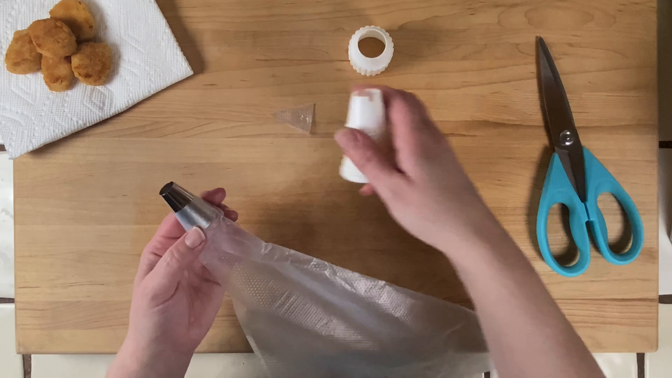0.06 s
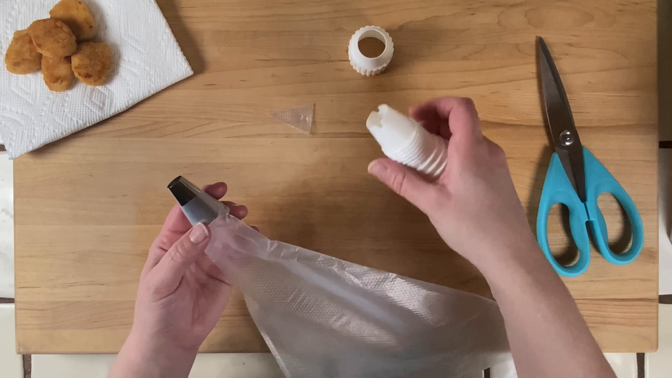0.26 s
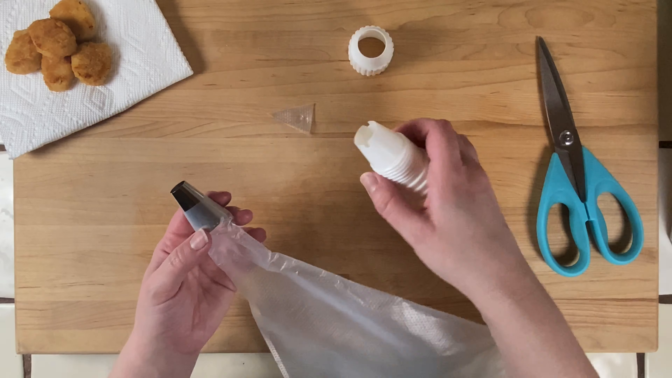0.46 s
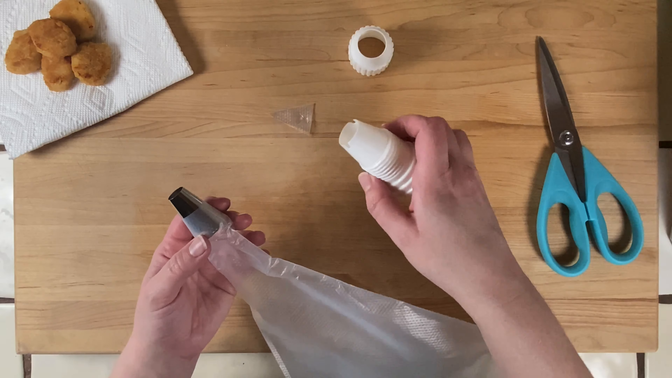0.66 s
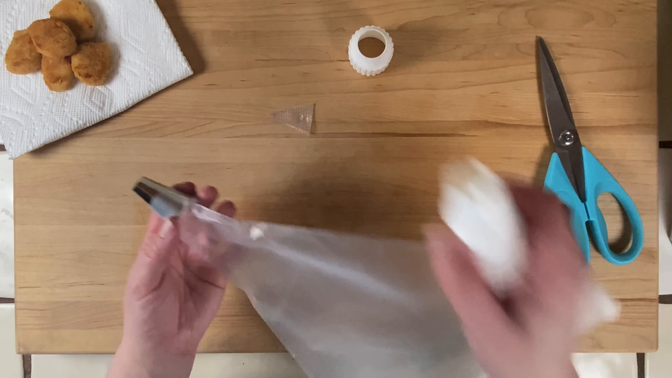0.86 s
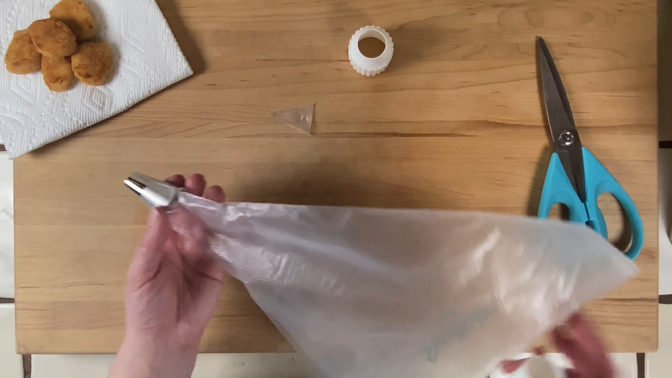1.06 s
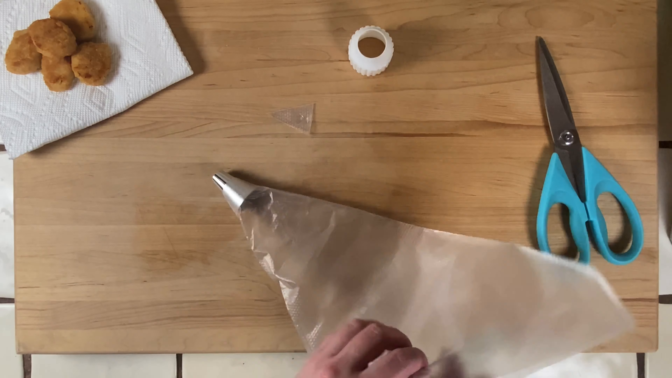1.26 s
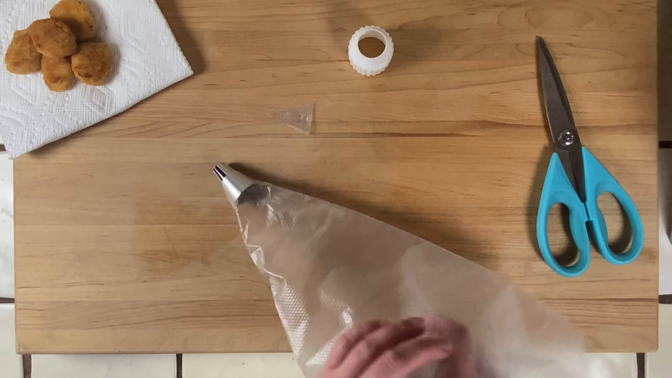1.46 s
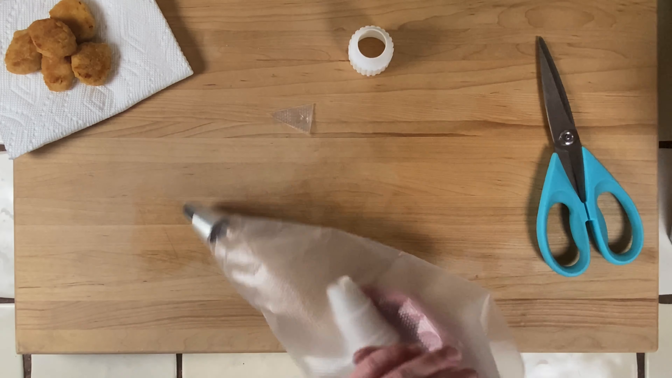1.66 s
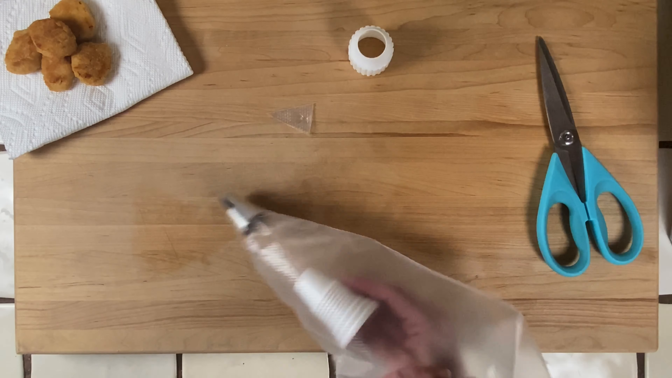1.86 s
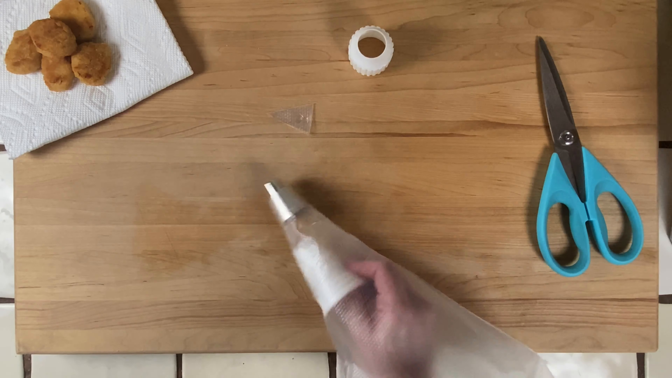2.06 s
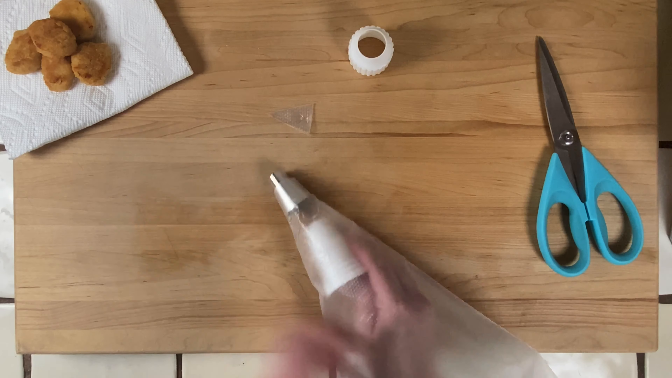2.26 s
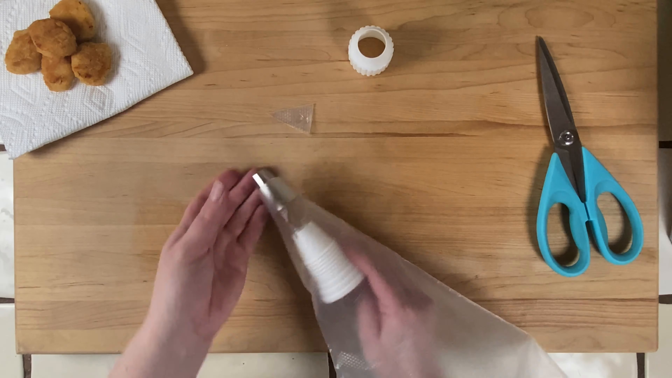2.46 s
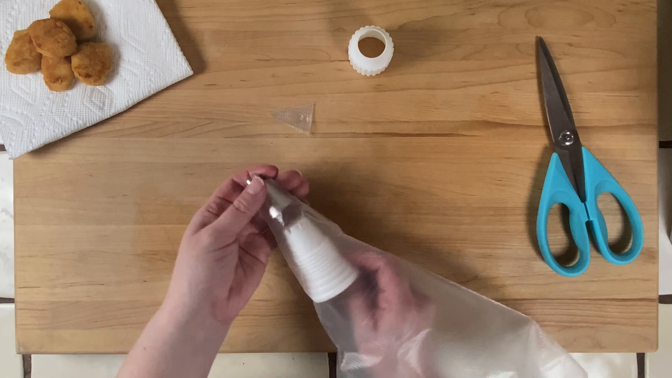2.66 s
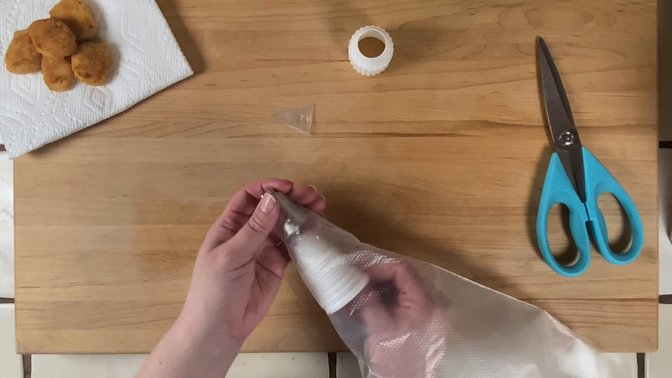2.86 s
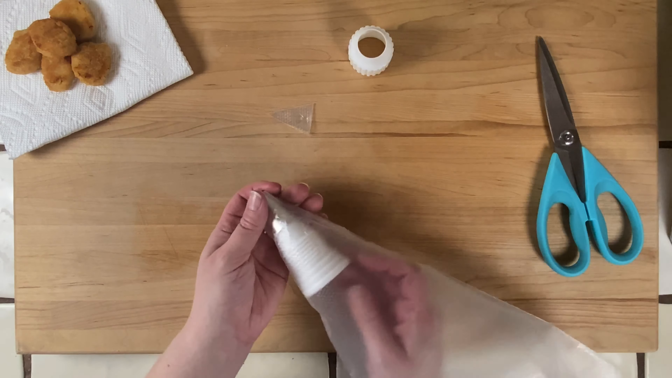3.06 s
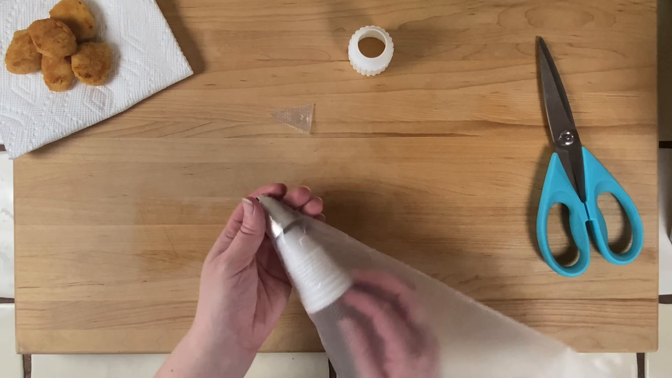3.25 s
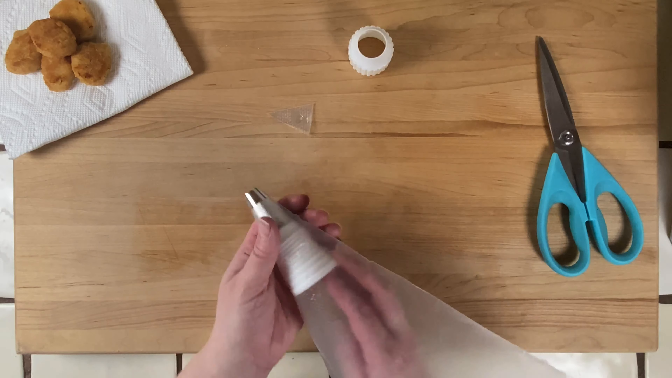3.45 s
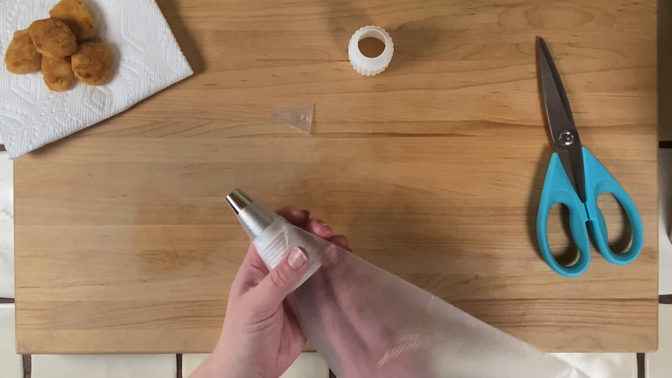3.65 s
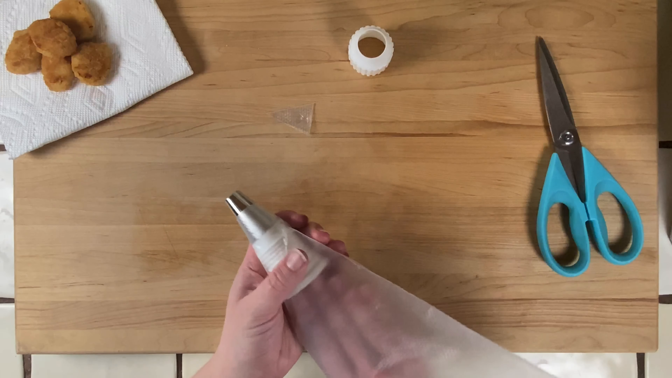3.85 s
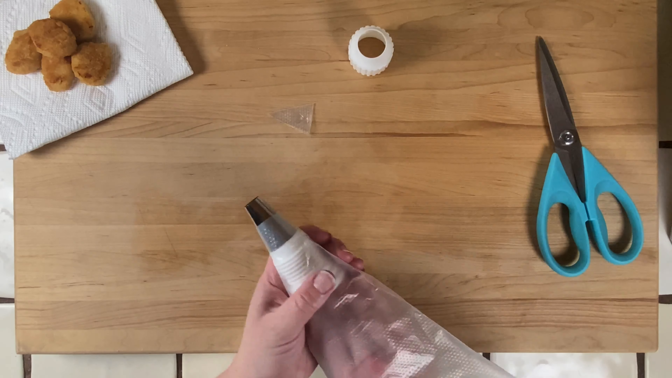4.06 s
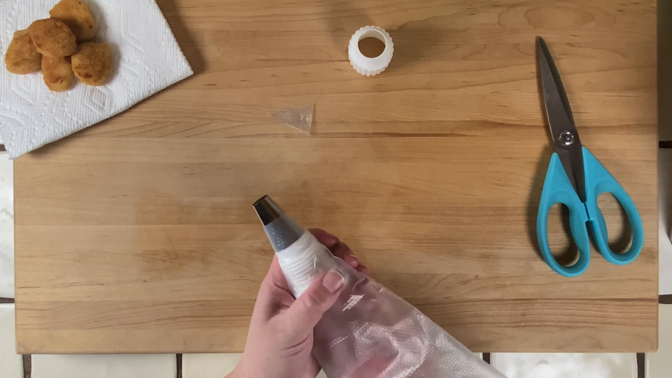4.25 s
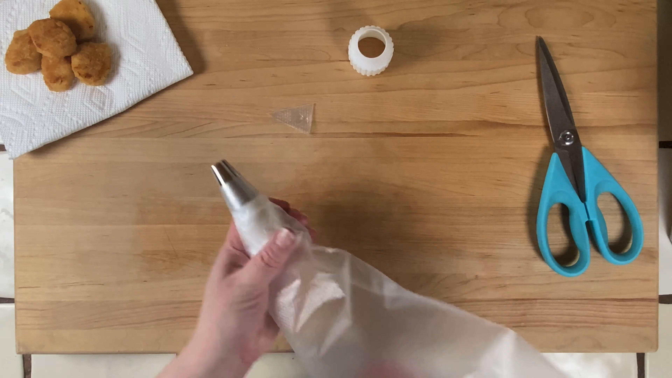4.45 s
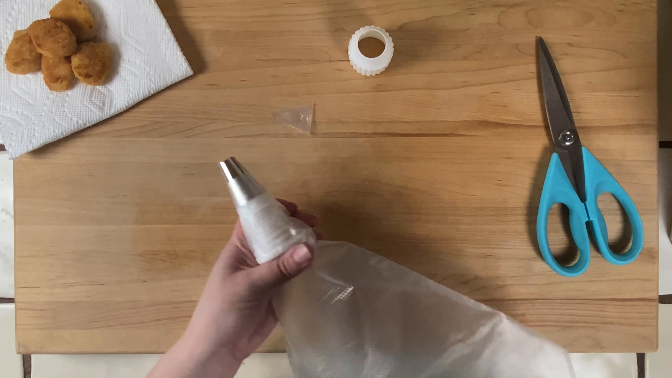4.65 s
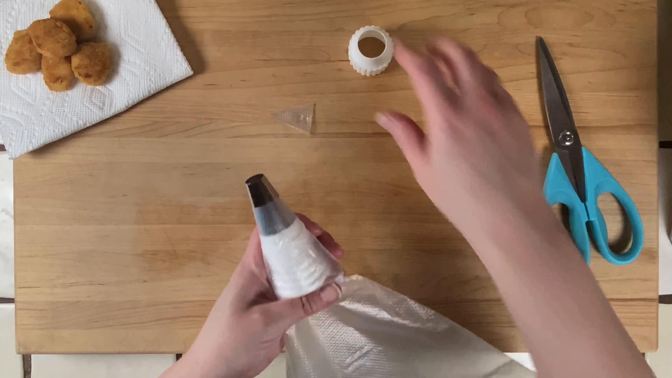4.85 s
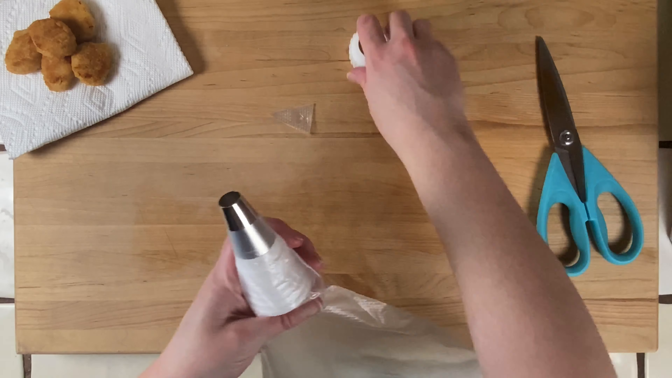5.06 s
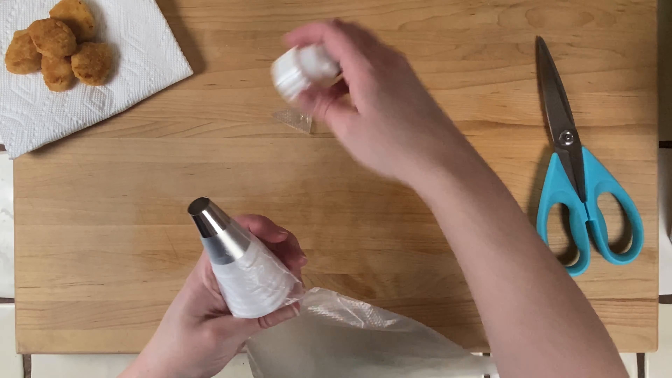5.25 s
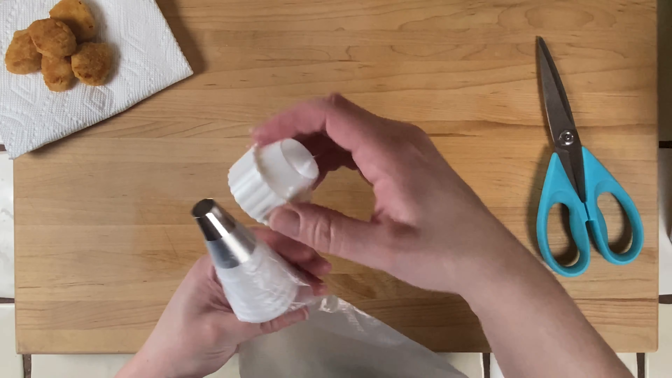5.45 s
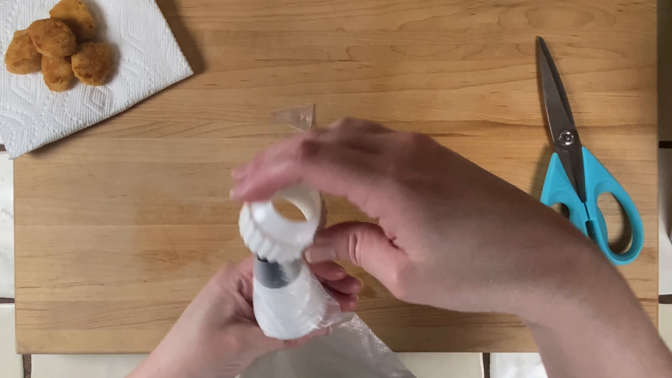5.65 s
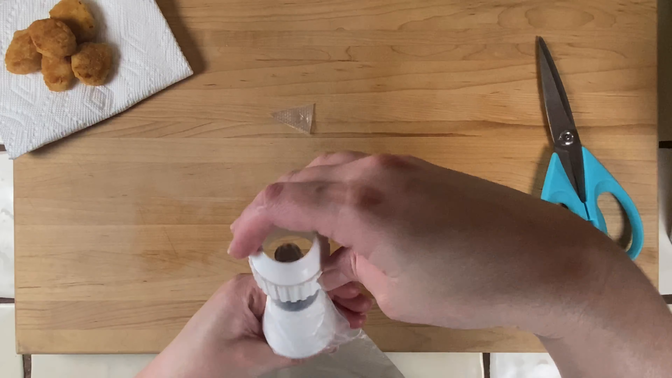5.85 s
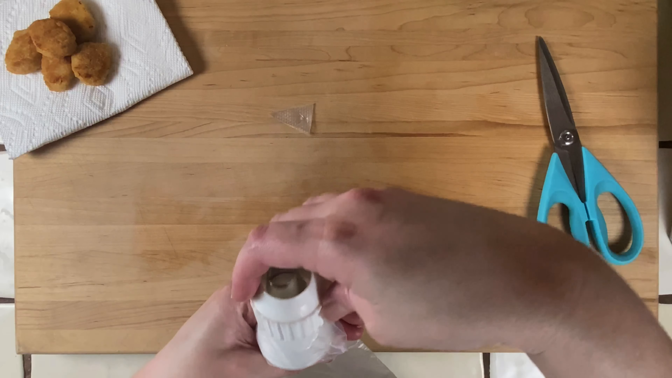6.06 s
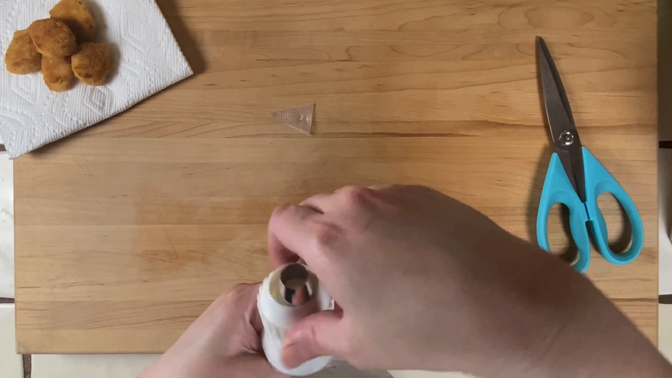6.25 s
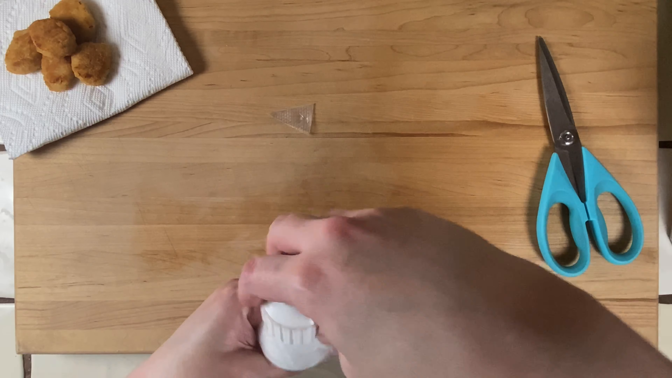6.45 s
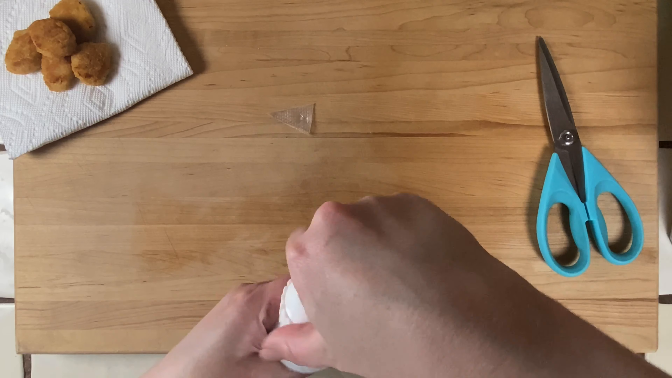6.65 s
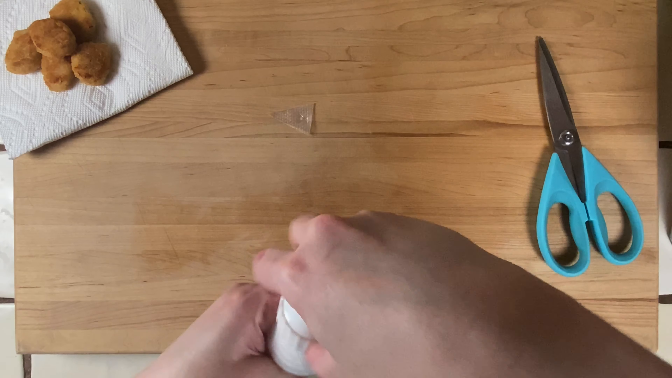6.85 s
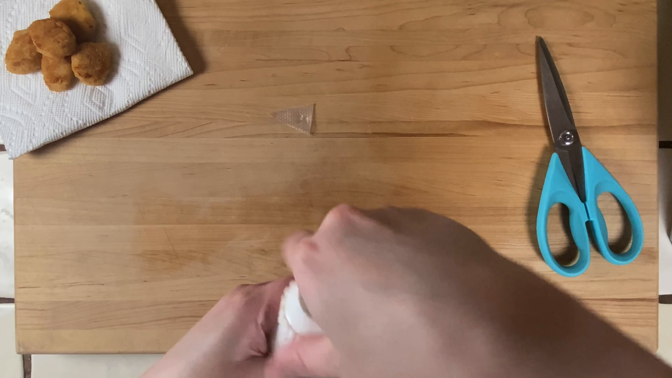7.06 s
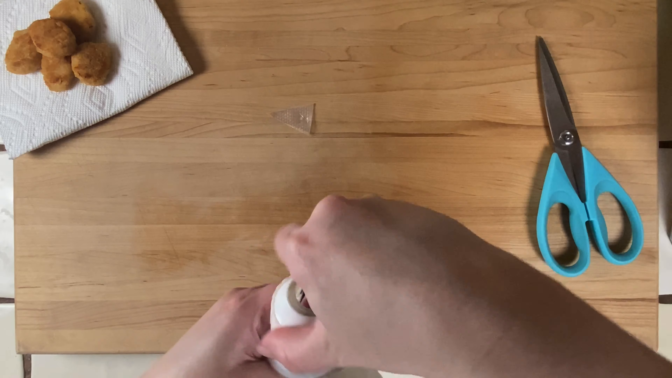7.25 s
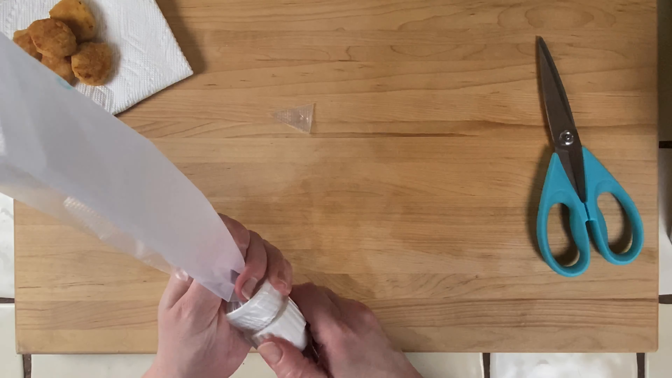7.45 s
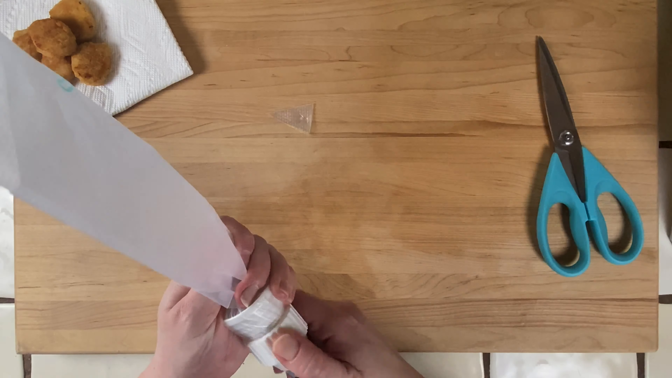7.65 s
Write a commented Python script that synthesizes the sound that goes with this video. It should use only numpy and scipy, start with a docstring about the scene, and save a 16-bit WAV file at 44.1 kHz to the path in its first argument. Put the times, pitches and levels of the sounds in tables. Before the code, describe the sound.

Sparse crackles of a thin plastic bag and a couple of soft plastic taps come first, then loud, irregular rustling and popping for several seconds. It thins to bright small crinkles, plastic clacks and short dry thread ticks with quiet gaps. Close stereo pickup, short dull room tail, faint low fridge hum.

```python
"""Thin plastic film crinkles and snaps as hands work a coupler into a piping bag and screw its ring on.
Crinkle is banded noise shaped by random creases; snaps are noise bursts with a ringing pluck; small cracks
fill in. Film and cone colour them; dry ticks and hollow knocks come from the hard plastic over a board.
A refrigerator hums as steady sines over faint room noise, and a short dull kitchen tail follows the hands."""
import sys
import numpy as np
from scipy import signal
from scipy.fft import rfft, irfft, next_fast_len
from scipy.io import wavfile
from scipy.ndimage import uniform_filter1d

SR = 44100
rng = np.random.default_rng(int(sys.argv[2]) if len(sys.argv) > 2 else 0)


def put_to_file(sound):
    """Save the sound as 16-bit audio at rate SR, in the file named by the first command-line argument."""
    columns = np.atleast_2d(sound).T  # one column per channel
    safe = np.clip(columns, -1, 1)
    whole_steps = np.round(safe * 32767)
    wavfile.write(sys.argv[1], SR, whole_steps.astype(np.int16))


N = 340011
SIZE = next_fast_len(N + 8192)   # FFT length, with room for filter tails
HZ = np.arange(SIZE // 2 + 1) * SR / SIZE


def from_db(db):
    """Decibels to gain."""
    return 10 ** (np.asarray(db) / 20)


def rms_one(x):
    """Scale to unit rms."""
    return x / np.sqrt(np.mean(x ** 2) + 1e-20)


def at_hz(points):
    """Read a table of (Hz, value) on the FFT grid, straight on a log frequency axis."""
    hz, value = np.transpose(points)
    return np.interp(np.log(HZ + 1), np.log(hz + 1), value)


def causal(x, db):
    """Filter by a dB response with minimum phase, so that nothing sounds early."""
    cepstrum = irfft(db * np.log(10) / 20, SIZE)
    cepstrum[1:SIZE // 2] *= 2
    cepstrum[SIZE // 2 + 1:] = 0
    return irfft(rfft(x, SIZE) * np.exp(rfft(cepstrum)), SIZE)[..., :N]


def butter(x, order, cut_hz, kind):
    """Butterworth filter of the given order."""
    return signal.sosfilt(signal.butter(order, cut_hz, kind, fs=SR, output="sos"), x)


def resonator(hz, t60):
    """Pole radius, sine of the pole angle and feedback terms of a ring that dies by 60 dB in t60 seconds."""
    r = from_db(-60 / (t60 * SR))
    w = 2 * np.pi * hz / SR
    return r, np.sin(w), [1, -2 * r * np.cos(w), r * r]


def drift(rate_hz):
    """Slow random wander with unit rms, worked out every 40 samples."""
    r = np.exp(-80 * np.pi * rate_hz / SR)
    white = rng.standard_normal(N // 40 + 2002)
    slow = signal.lfilter([1], [1, -2 * r, r * r], white)[2000:]
    return np.interp(np.arange(N) / 40, np.arange(len(slow)), rms_one(slow))


def gritty(shape, grit_db):
    """Noise of tiny cracks with very unequal sizes, at unit rms."""
    sizes = from_db(grit_db * np.minimum(rng.standard_normal(shape), 2))
    return rms_one(rng.standard_normal(shape) * sizes)


def split(layers):
    """Cut each frequency band from its own layer of sound and sum the bands."""
    # Band edges in Hz, from low to high.
    edges_hz = [60, 300, 1150, 1800, 2800, 4200, 6500, 10000, 17000]
    bands = zip(edges_hz, edges_hz[1:])
    return sum(butter(layer, 2, edges, "band") for edges, layer in zip(bands, layers))


def refrigerator():
    """Compressor hum: steady sine tones whose levels waver a little."""
    # Each row: frequency in Hz, level in dB.
    hum_tones = [(72.0, -59.5), (134.6, -69), (145.3, -76), (208.6, -74)]
    t = np.arange(N) / SR
    out = 0
    for hz, db in hum_tones:
        gain = np.sqrt(2) * from_db(db + 1.5 * drift(3.9))
        out = out + gain * np.sin(2 * np.pi * (hz * t + rng.random()))
    return out


def room_noise():
    """Faint coloured noise, slowly wavering in level."""
    # Colour of the air. Each row: frequency in Hz, relative density in dB per Hz.
    air_colour, air_db = [(100, 3), (170, -5), (260, -2.5), (400, -11.5), (600, -9), (800, -4), (1000, -46),
                          (1200, -17.5), (1500, -19), (2500, -14), (4000, -15.5), (6000, -20.5),
                          (9000, -20.5), (14000, -24.5)], -66
    air = causal(rng.standard_normal((2, N)), at_hz(air_colour))
    return from_db(air_db + 0.5 * drift(0.77)) * rms_one(air)


def effort():
    """Drive of the crinkle in dB from handling and ring turns together, and the turns' share of its power."""
    # How hard the hands work the film. Each row: time in seconds, drive in dB.
    handling = [(0.0, -57), (0.68, -90), (1.14, -74.5), (1.3, -45), (1.44, -41.5), (1.5, -33.5),
                (1.52, -36), (1.565, -32), (1.64, -36.5), (1.75, -31), (1.8, -40.5), (1.86, -32),
                (1.99, -37), (2.2, -35.5), (2.24, -45.5), (2.51, -63), (2.605, -59), (2.63, -37.5),
                (2.81, -40), (2.93, -35), (3.06, -32.5), (3.08, -43.5), (3.19, -47.5), (3.33, -49.5),
                (3.48, -42), (3.67, -43.5), (3.91, -54.5), (4.12, -40), (4.21, -51), (4.38, -36),
                (4.47, -41.5), (4.64, -33), (4.81, -41), (4.85, -52), (5.0, -50.5), (5.06, -58),
                (5.13, -63.5), (5.33, -65.5), (5.4, -45), (5.43, -42.5), (5.455, -44.5), (5.52, -60.5),
                (5.63, -48), (5.84, -63), (6.03, -88), (7.1, -78.5), (7.45, -99), (7.71, -74.5)]
    # Ring turns that drag film over the thread. Each row: time of the peak in seconds, drive in dB.
    ring_turns = [(6.141, -64), (6.26, -58.5), (6.656, -50), (6.938, -52.5), (7.26, -55.5)]
    rise_db_per_s, fall_db_per_s = 233, 180
    t = np.arange(N) / SR
    hands = from_db(np.interp(t, *np.transpose(handling))) ** 2
    turns = 0
    for s, db in ring_turns:
        below_db = np.where(t < s, rise_db_per_s * (s - t), fall_db_per_s * (t - s))
        turns = turns + from_db(db - below_db) ** 2
    return 10 * np.log10(hands + turns), turns / (hands + turns)


def crinkle(spread_db, clump_db, colour_db, crease_t60, smooth, even):
    """Creases give way at random, in clumps; each shakes the film for a few ms in a colour of its own."""
    # Colour as the bag is opened, filled and gripped.
    # Each row: time in seconds, then treble, cone, low body and upper middle, all in dB.
    colour_moves = [(0, -2, -4, 0.5, 3), (1.2, 0, -3, 0, 0), (2.2, 0.5, -6, 0, 2),
                    (2.5, -3, 1.5, -2.5, 2.5), (3.0, -0.5, -6.5, -1.5, -0.5), (3.4, -3.5, 2.5, -0.5, -1.5),
                    (4.1, 1.5, 3.5, 0, 2), (4.8, 1.5, -4.5, -0.5, -0.5), (5.4, -4, 2.5, 3, -1.5),
                    (6.0, -5, -2, -0.5, 6), (7.0, -14, -19, 0, 1)]
    # Band trims. Each pair: dB at firm handling, dB gained for each dB that the handling is lighter.
    thud, low_body = (0.7, 0.32), (0.85, 0.28)
    cone, treble = (0.1, 0.017), (-4, .01)
    firm_db, turn_treble_db = -35, 15   # drive of firm handling; treble lift of a pure ring turn

    level_db, turning = effort()
    lighter_db = firm_db - level_db
    s, *colour = np.transpose(colour_moves)
    treble_db, cone_db, low_db, upper_db = [np.interp(np.arange(N) / SR, s, c) for c in colour]

    per_s = np.clip(1300 * from_db(-0.34 * lighter_db), 40, 8000)   # firmer handling, more creases
    born = rng.random(N) < per_s * from_db(clump_db * drift(25)) / SR
    size_db = spread_db * np.minimum(rng.exponential(1, N), 1.9) + rng.normal(0, colour_db, (8, N))
    fade = from_db(-120 / (crease_t60 * SR))   # decay of power
    power = signal.lfilter([1], [1, -fade], born * from_db(size_db) ** 2 / per_s + 1e-18)
    # A crease takes a moment to run.
    power = signal.lfilter([1], [1, -np.exp(-1 / (0.0014 * SR))], power)
    power = power / power.mean() + smooth   # sliding film fills the gaps
    # Slightly even out the loudness of the crinkle over nearby moments.
    nearby = uniform_filter1d(power.mean(0), size=3000)
    shake = np.sqrt(power / nearby ** np.clip(even, 0, 1))

    shake[0] *= from_db(thud[0] + thud[1] * lighter_db)
    shake[1] *= from_db(low_body[0] + low_body[1] * lighter_db + low_db)
    shake[2] *= from_db(cone[0] + cone[1] * lighter_db + cone_db)
    shake[4] *= from_db(upper_db)
    shake[6:] *= from_db(treble[0] + treble[1] * lighter_db + treble_db + turn_treble_db * turning)
    noise = gritty((2, 2, N), grit_db=6.5)
    return from_db(level_db) * split(shake[k] * noise[k % 2] for k in range(8))


def crackle(per_s, spread_db, level_db, cycles):
    """Lone sharp cracks at random, each ringing a few cycles at the pitch of a small panel."""
    sizes = from_db(spread_db * np.minimum(rng.exponential(1, N), 2.5)) * rng.choice([-1, 1], N)
    born = rng.random(N) < per_s * from_db(5.0 * drift(18)) / SR
    panel = rng.integers(0, 12, N)
    out = 0
    for k, hz in enumerate(np.geomspace(1550, 6000, 12)):
        _, sine, feedback = resonator(hz, cycles / hz)
        out = out + signal.lfilter([0, sine], feedback, sizes * born * (panel == k) + 1e-18)
    return from_db(effort()[0] + level_db) * rms_one(out)


def snaps(rise_share, treble_share, cycles, ring_db, pluck_db):
    """Each snap is a noise burst that dies fast, treble first, and a pluck ringing at its panel's pitch."""
    # Single snaps of film. Each row: time in seconds, drive in dB, pitch in Hz, treble and bass in dB
    # against the drive, decay time to -60 dB in seconds before limiting.
    snap_list = [(0.0195, -36, 3820, -9, -5, 0.02), (0.0346, -38, 1460, -23, -11, 0.029),
                 (0.093, -29.5, 1420, -1, -8, 0.024), (0.106, -35, 1490, -6, -6, 0.014),
                 (0.127, -30, 1310, -17, -5, 0.02), (0.148, -37, 1890, -8, -20, 0.023),
                 (0.2577, -37.5, 3420, -9, -13, 0.019), (0.302, -39, 5000, -13, -23, 0.019),
                 (0.316, -36, 3000, -14, -18, 0.025), (0.42, -33, 3520, -5, 5, 0.024),
                 (0.828, -43.5, 4700, -9, -10, 0.017), (0.8653, -43.5, 1520, -13, -20, 0.034),
                 (0.8817, -37, 2800, -3, 3.5, 0.027), (0.907, -42, 1600, -20, -17, 0.018),
                 (0.93, -39, 1810, -25, -27, 0.018), (1.022, -41, 1350, -11, -8, 0.021),
                 (1.1294, -50, 2550, -16, -10, 0.051), (1.1527, -34, 1680, -6, -3, 0.023),
                 (1.186, -37, 2100, -13, -12, 0.019), (1.214, -35, 2430, 0, -22, 0.03),
                 (1.265, -26, 4830, -10, -14, 0.022), (1.3041, -15.5, 1700, 0.5, -4, 0.041),
                 (1.38, -17, 2860, -6, -19.5, 0.021), (1.4, -27, 2500, 7.5, -11, 0.015),
                 (1.441, -23.5, 3000, 4, -17, 0.0064), (1.4528, -24.5, 2740, -3, -16, 0.025),
                 (1.471, -25.5, 3000, -2, -17, 0.01), (1.484, -20.5, 3000, 2, -31, 0.031),
                 (1.5308, -14, 2500, -9, -15, 0.013), (1.564, -18, 4800, -4.5, -1, 0.029),
                 (1.591, -16.5, 2520, -17, -12, 0.014), (1.68, -21, 2410, 6, -23, 0.023),
                 (1.7426, -17.5, 2410, 3, 5, 0.028), (1.805, -22, 5370, 4, -12, 0.024),
                 (1.825, -31, 4020, 8, -12, 0.044), (1.8808, -21.5, 2600, 10, 8.5, 0.028),
                 (2.0136, -19.5, 2540, -2.5, -11, 0.085), (2.0453, -18, 3230, -0.5, -8, 0.11),
                 (2.1731, -24.5, 2630, 4, 5, 0.081), (2.197, -26.5, 2410, 3, -11.5, 0.033),
                 (2.2442, -27.5, 2480, -27, -19, 0.036), (2.2917, -24, 1660, -16, -26, 0.042),
                 (2.33, -26, 2400, 0, -3, 0.019), (2.373, -27, 1900, -6, -5, 0.046),
                 (2.4, -37.5, 4450, 9, -10, 0.014), (2.4266, -28, 2340, -14, -20, 0.015),
                 (2.441, -27.5, 2340, -3, -10, 0.015), (2.487, -28, 4500, -5, -13, 0.012),
                 (2.4793, -36, 5600, -1, -2, 0.037), (2.4946, -27, 4120, -10.5, -1, 0.027),
                 (2.5414, -36, 2170, -28, -25, 0.037), (2.589, -46, 4650, -23, -10, 0.033),
                 (2.6319, -21, 2340, -7, 1, 0.046), (2.6676, -23, 4700, -10, -26, 0.026),
                 (2.6848, -19, 2400, -4, -5, 0.032), (2.7374, -26.5, 2550, 4, -27, 0.04),
                 (2.748, -38, 4800, 6, -10, 0.013), (2.821, -32, 5000, 9.5, -10, 0.022),
                 (2.84, -27, 1770, -4, 7, 0.1), (2.8906, -34, 2340, -4, -13, 0.018),
                 (2.9098, -26, 2870, -3, -17, 0.042), (2.9555, -13, 1650, -2, -20, 0.018),
                 (2.965, -20.5, 5000, -5, -6, 0.028), (3.015, -20.5, 1700, -9, -30, 0.025),
                 (2.9918, -18, 2180, -6, -6, 0.032), (3.04, -12, 1650, -4, -7, 0.02),
                 (3.1432, -22, 5400, -11, -24, 0.014), (3.168, -25, 5400, -4, -21, 0.017),
                 (3.2052, -24.5, 1650, -14, -14, 0.033), (3.223, -23.5, 1590, -8, -4, 0.048),
                 (3.2496, -21.5, 1920, -14, -39, 0.043), (3.273, -23, 1630, -23, -36, 0.046),
                 (3.332, -32, 3500, -5, -13, 0.014), (3.3436, -23, 1350, -5.5, -5, 0.028),
                 (3.3812, -42, 5130, -6, -10, 0.019), (3.405, -39, 1570, 14.5, -13, 0.026),
                 (3.4533, -31.5, 2390, 12, 0, 0.018), (3.485, -23.5, 1650, 0, -5, 0.03),
                 (3.549, -20.5, 1650, -1, -6, 0.011), (3.553, -21.5, 4770, -2, -15, 0.014),
                 (3.5886, -19.5, 1510, -2, -19, 0.036), (3.622, -18.5, 1540, -7, -10, 0.037),
                 (3.639, -20, 1480, -9, -20, 0.016), (3.658, -21, 2380, -6, -15, 0.015),
                 (3.671, -21, 1610, -3, -10, 0.015), (3.7044, -24, 3320, 1.5, -5, 0.024),
                 (3.718, -22.5, 1570, 0, -22, 0.026), (3.736, -22.5, 2980, 0, -8, 0.023),
                 (3.767, -22, 2480, -14, -1.5, 0.021), (3.798, -19.5, 3860, -6, -10, 0.016),
                 (3.824, -27, 2410, -9, -13, 0.021), (3.8618, -32.5, 2500, -16, -1.5, 0.1),
                 (3.884, -22, 2200, -4, -8, 0.03), (3.954, -29.5, 2520, -19, -7, 0.034),
                 (3.9995, -22.5, 2860, -12, 3.5, 0.016), (4.0259, -21.5, 1540, -0.5, 0.5, 0.045),
                 (4.0552, -25, 1390, 1, -28, 0.02), (4.0936, -19.5, 1380, -5, 1, 0.033),
                 (4.104, -13, 1430, 1, -22, 0.0098), (4.116, -28.5, 2700, 15.5, -5, 0.015),
                 (4.1498, -29, 2480, 9.5, -7, 0.024), (4.2232, -28, 1280, -16, -17, 0.035),
                 (4.239, -25, 2640, 3, -15, 0.019), (4.276, -35, 1360, 10, -14, 0.025),
                 (4.308, -23, 2680, -6, 5, 0.039), (4.328, -21, 2380, -5, -31, 0.05),
                 (4.456, -24, 2420, -17, -21, 0.066), (4.4807, -19, 4250, -5, -34, 0.073),
                 (4.609, -10.5, 2410, -6, -11, 0.012), (4.64, -20, 4970, 3.5, -21, 0.037),
                 (4.659, -19.5, 2400, 8, 4, 0.014), (4.871, -42.5, 5600, 11, -1, 0.039),
                 (4.9118, -29, 2290, -0.5, -17, 0.033), (4.9537, -29, 5600, -1, 4, 0.034),
                 (4.969, -26, 2000, -6, 2, 0.012), (5.001, -30, 4500, -5, -10, 0.021),
                 (4.994, -28, 5300, 6.5, -11, 0.02), (5.027, -29, 3030, 0.5, 3.5, 0.034),
                 (5.091, -30, 5740, 0, -20, 0.015), (5.169, -38.5, 4620, 14, 9, 0.015),
                 (5.183, -34, 4440, -6, 0, 0.015), (5.2075, -31, 3850, -1, 5.5, 0.031),
                 (5.217, -25, 4800, 1, -6, 0.0073), (5.226, -24, 1430, -4, -22, 0.0077),
                 (5.271, -35.5, 4140, -7, -18, 0.026), (5.286, -29.5, 4700, 1.5, 3, 0.02),
                 (5.296, -27.5, 1820, -11, -24, 0.013), (5.3396, -34, 1510, -8, -16, 0.034),
                 (5.381, -24.5, 5170, 1, -7, 0.026), (5.4196, -26.5, 5600, 5, -2, 0.1),
                 (5.477, -35, 1300, -4, 1, 0.02), (5.5, -35.5, 5290, -2, 4, 0.039),
                 (5.5391, -32, 3620, 2, 7, 0.026), (5.5792, -28, 4640, -8, -4, 0.026),
                 (5.6114, -35.5, 3190, 10, -10, 0.018), (5.638, -32, 1280, -9, -18, 0.024),
                 (5.662, -34.5, 5630, 10.5, -14, 0.023), (5.7035, -33.5, 3320, -6, -12, 0.023),
                 (5.7438, -18, 1830, 5, -28, 0.01), (5.8, -38, 3100, -5, -18, 0.019),
                 (5.874, -46, 4640, 0, -14, 0.031), (5.8913, -37.5, 2430, -9, -21, 0.031),
                 (5.9832, -42.5, 3260, -7, -4, 0.024), (6.05, -56, 2800, 8, -14, 0.084),
                 (6.0793, -40.5, 3360, 10.5, -12, 0.037), (6.134, -34, 2570, 5.5, -6, 0.081),
                 (6.193, -40, 2500, 5, -4, 0.057), (6.2489, -28.5, 4930, -4, -27, 0.012),
                 (6.2892, -38.5, 4230, 14, -11, 0.02), (6.3748, -41, 3500, -10, -18, 0.03),
                 (6.506, -44, 4480, -11, -25, 0.025), (6.551, -40, 2250, 0, -16, 0.039),
                 (6.572, -48, 2870, 13, -6, 0.03), (6.605, -46, 4700, 1, -12, 0.051),
                 (6.6315, -28.5, 5600, 8.5, -18, 0.024), (6.659, -30, 1580, 1, -22, 0.041),
                 (6.7464, -34.5, 1500, -12, -22, 0.024), (6.851, -36.5, 2430, -8, -4, 0.027),
                 (6.8948, -35, 2410, 3.5, -26, 0.032), (6.914, -38.5, 5340, 8, -5, 0.047),
                 (6.964, -36, 2460, -8, -14, 0.016), (6.98, -30.5, 2920, 3, -19, 0.03),
                 (7.043, -40, 1300, -11, -4, 0.026), (7.0685, -42, 1250, -1, -16, 0.034),
                 (7.201, -52.5, 3100, -4, 1, 0.044), (7.221, -27.5, 3350, -2, -8, 0.024),
                 (7.28, -30, 6150, -2, -5, 0.026), (7.307, -32.5, 1900, -4, 7, 0.02),
                 (7.3345, -38.5, 2260, -15, -1, 0.029), (7.355, -42.5, 5670, -24.5, -13, 0.021),
                 (7.376, -45, 1710, -18, -4, 0.018), (7.6294, -52, 6000, -3, 8, 0.017),
                 (7.672, -42.5, 1530, -12, -34, 0.05)]
    low_hz, high_hz = 1150, 6500   # crossovers of the three bands
    panel_span = 1.8   # the panel band covers this ratio either side of the pitch
    lead_s = 0.0015    # the burst starts this long before the pluck

    out = np.zeros((3, 2, N + 2048))
    t = np.arange(2048) / SR
    noise = gritty((len(snap_list), 2, 2048), grit_db=7.0)
    for (s, peak_db, hz, treble_db, bass_db, t60), burst in zip(snap_list, noise):
        age = t / np.clip(t60, .004, .09)
        rise = rise_share * from_db(0.097 * (peak_db + 42.0))   # louder snaps swell in more slowly
        shape = (1 - np.exp(-age / rise)) ** 2 * from_db(-60 * age)
        burst = burst * from_db(peak_db) * shape / shape.max()

        r, sine, feedback = resonator(hz, cycles / hz)
        ring = signal.lfilter([1 - r * r], feedback, burst) * sine
        after = np.maximum(t - lead_s, 0)
        pluck = from_db(peak_db + pluck_db - 60 * hz * after / cycles)
        ring[0] += pluck * np.sin(2 * np.pi * hz * after)

        panel = butter(burst, 1, [hz / panel_span, hz * panel_span], "band")
        bass = burst * from_db(bass_db)
        middle = from_db(0.5) * panel + from_db(ring_db) * ring
        crisp = burst * from_db(treble_db - treble_share * 60 * age)
        start = max(round((s - lead_s) * SR), 0)
        out[..., start:start + 2048] += [bass, middle, crisp]

    low, mid, high = out[..., :N]
    low = butter(low, 2, low_hz, "low")
    mid = butter(mid, 2, [low_hz, high_hz], "band")
    high = butter(high, 2, high_hz, "high")
    return from_db(-11.0) * (low + mid - high)   # opposite sign joins the bands in step


def bag():
    """Film sounds coloured by the film and the resonances around it; two rows, alike in rhythm only."""
    # Colour of the film. Each row: frequency in Hz, relative response in dB.
    film_colour = [(150, -5.5), (280, -12.5), (420, -9), (520, -11.5), (800, -7), (1100, -2), (1400, 0),
                   (2000, -0.5), (3000, 2), (4500, -3), (6000, 0), (9000, 0), (12000, -4), (14000, -2.5)]
    # Air in the cone and the board under it. Each row: frequency in Hz, width in Hz, lift in dB.
    body_modes = [(192.2, 15.3, 9), (611, 169, 15), (967, 55, 7.5), (1280, 130, 5), (1550, 98, 0.5),
                  (2410, 240, 4.5), (3100, 270, 1), (4620, 850, 6.5)]
    lift_db = sum(db / (1 + (2 * (HZ - hz) / width) ** 2) for hz, width, db in body_modes)
    film = crinkle(spread_db=6.5, clump_db=4.0, colour_db=5.0, crease_t60=0.0056, smooth=0.15, even=0.043)
    # A panel of film rings only briefly: 15 cycles to -60 dB.
    film = film + snaps(rise_share=0.1, treble_share=0.29, cycles=15, ring_db=-1.0, pluck_db=0.0)
    cracks = crackle(per_s=400.0, spread_db=3.0, level_db=-7.5, cycles=12.8)
    film = film + cracks * [[1], [0]]   # shared row only
    return causal(film, at_hz(film_colour) + lift_db + 4.5)


def ticks(t60, low_hz):
    """Hard plastic and thread tick drily: cracks of a few milliseconds without bass."""
    # Each row: time in seconds, strength in dB.
    tick_list = [(0.094, -40), (0.247, -39), (0.883, -37.5), (1.151, -38), (1.173, -31), (1.2628, -26.5),
                 (2.3301, -43), (2.426, -44), (2.497, -35), (3.1437, -30), (3.2552, -29), (3.8, -29),
                 (4.9089, -22.5), (4.9549, -24), (4.991, -27), (5.029, -32), (5.164, -29), (5.213, -42),
                 (5.4103, -22), (5.498, -31), (5.54, -39), (5.5812, -20), (5.639, -31), (5.664, -41),
                 (5.723, -30), (5.735, -32), (5.7412, -27), (5.8023, -20.5), (5.8747, -35), (6.084, -48),
                 (6.086, -35), (6.092, -29.5), (6.125, -30), (6.136, -43), (6.148, -34), (6.155, -38),
                 (6.16, -26.5), (6.194, -27.5), (6.2487, -34), (6.265, -35.5), (6.2892, -41), (6.552, -42),
                 (6.6296, -40), (6.6685, -41), (6.676, -26), (6.918, -31), (6.9294, -29), (6.949, -33),
                 (6.9634, -26.5), (6.983, -35), (7.22, -35.5), (7.269, -27), (7.282, -27), (7.291, -26),
                 (7.628, -37.5)]
    power = np.zeros(N) + 1e-18
    power[[round(s * SR) for s, db in tick_list]] = from_db(np.array(tick_list)[:, 1]) ** 2
    shape = np.sqrt(signal.lfilter([1], [1, -from_db(-120 / (t60 * SR))], power))
    return butter(shape * rng.standard_normal(N), 2, low_hz, "high")


def knocks():
    """Hollow plastic parts knock: each strike excites every mode; the second mode belongs to the ring."""
    # Each row: time in seconds, strength in dB, lift of the ring's own mode in dB.
    knock_list = [(0.147, -34, -18), (0.934, -36, -13), (1.222, -21.5, -21), (1.457, -24, -24),
                  (2.23, -24, -23), (2.296, -29, -1), (2.321, -25, -22), (2.636, -23.5, -9),
                  (5.001, -21.5, -27), (5.096, -26.5, -16), (5.664, -47, 12), (5.707, -48, 20.5),
                  (5.733, -44, 9), (5.7424, -25, 3.5), (6.678, -32, -28), (6.925, -48, 0),
                  (7.203, -42, -20), (6.895, -38, 1), (7.336, -44.5, 3)]
    # Modes of the hollow parts. Each row: frequency in Hz, level in dB, decay time to -60 dB in seconds.
    hollow_modes = [(634, -13.5, 0.057), (968, -7.5, 0.032), (1650, -25.5, 0.018), (1920, -16, 0.028)]
    s, peak_db, ring_db = np.transpose(knock_list)
    at = np.round(s * SR).astype(int)
    out = np.zeros(N)
    for k, (hz, level_db, t60) in enumerate(hollow_modes):
        clicks = np.zeros(N) + 1e-18
        uneven_db = rng.normal(0, 0.69, len(at))
        clicks[at] = from_db(peak_db + level_db + (k == 1) * ring_db + uneven_db)
        _, sine, feedback = resonator(hz, t60)
        out += signal.lfilter([0, sine], feedback, clicks)
    return out


def kitchen(x):
    """A dense, dull tail of echoes; six random patterns take turns, each fed for 3000 samples."""
    t60_s, wall_cut_hz = 0.14, 6300
    t = np.arange(8000) / SR
    place = np.arange(N) // 3000 % 6
    wet = 0
    for k in range(6):
        # The tail starts 4 ms after the direct sound.
        tail = rng.standard_normal((2, 8000)) * from_db(-60 * t / t60_s) * (t > .004)
        tail = tail / np.sqrt(np.sum(tail ** 2) / 2)
        wet = wet + rfft(x * (place == k), SIZE) * rfft(tail, SIZE)
    return irfft(wet / (1 + 1j * HZ / wall_cut_hz), SIZE)[:, :N]


def scene():
    """Bag, knocks and ticks with echoes, hum and room noise: shared and unshared rows mixed to two ports."""
    kitchen_db = -5.5
    hard_plastic = knocks() + ticks(t60=0.0059, low_hz=2800)
    near = bag() + hard_plastic * [[1], [0]]
    shared, unshared = near + from_db(kitchen_db) * kitchen(near) + room_noise()
    shared = shared + refrigerator()
    return np.array([shared + unshared, shared - unshared])


def record(dry):
    """The two microphone ports are blended, balanced and shifted in phase; both ends are cut."""
    # Share of the power that the ports hear differently. Each row: frequency in Hz, share from 0 to 1.
    apart_share = [(100, 0), (400, 0.28), (650, 0.12), (950, 0.31), (1600, 0.1), (2600, 0.58), (3500, 0.2),
                   (4500, 0.53), (5500, 0), (9000, 0.01)]
    # Each row: frequency in Hz, left over right in dB.
    balance = [(80, 1), (200, 1.5), (400, -8.5), (600, -1), (950, -6), (1350, 2.5), (1900, -2.5),
               (2600, -2.5), (4500, -4), (5200, 0), (15000, 0)]
    # Phase by which right leads left. Each row: frequency in Hz, lead in radians.
    right_lead = [(0, 0), (120, .1), (300, .9), (480, .4), (760, 3.2), (900, 4.3), (1100, 9.6),
                  (1600, 12.1), (2400, 12.0), (2700, 16.4), (4000, 17.7), (4300, 16.7), (4750, 18.8),
                  (7300, 15.71), (17000, 5.88)]
    rumble_cut_hz, treble_cut_hz = 46.4, 16000

    left, right = rfft(dry, SIZE)
    apart = np.clip(at_hz(apart_share), 0, .9)
    mid = np.sqrt(1 - apart) * (left + right) / 2
    side = np.sqrt(apart) * (left - right) / 2
    tilt = from_db(at_hz(balance) / 2)
    lead = np.interp(HZ, *np.transpose(right_lead))
    pair = irfft([(mid + side) * tilt * np.exp(-1j * lead), (mid - side) / tilt], SIZE)[:, :N]
    pair = butter(pair, 4, rumble_cut_hz, "high")
    return signal.sosfilt(signal.cheby2(14, 60, treble_cut_hz, fs=SR, output="sos"), pair)


dry = scene()
out = record(dry)
put_to_file(out)
```